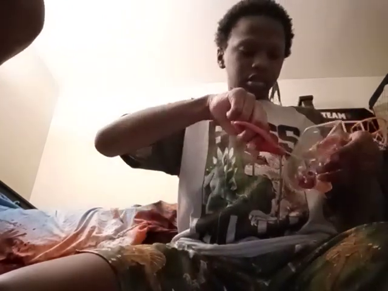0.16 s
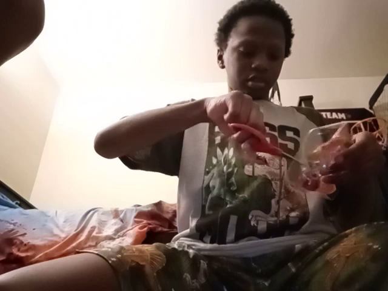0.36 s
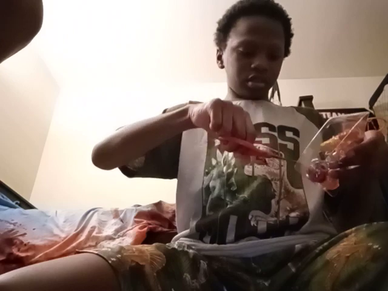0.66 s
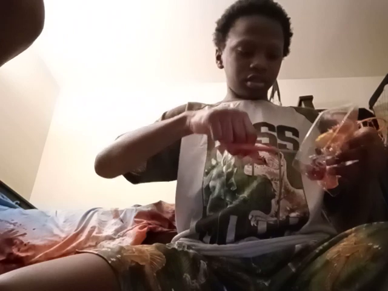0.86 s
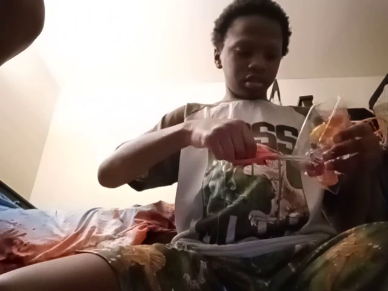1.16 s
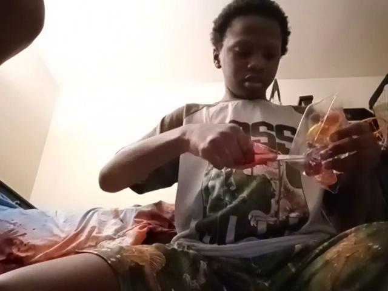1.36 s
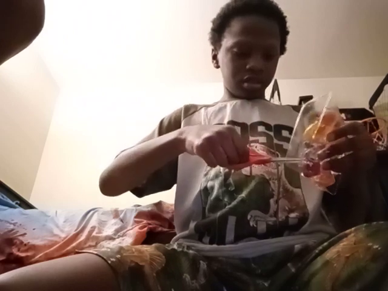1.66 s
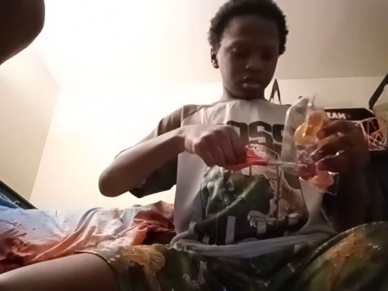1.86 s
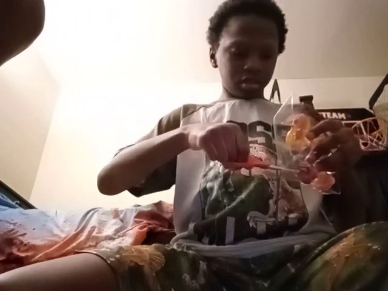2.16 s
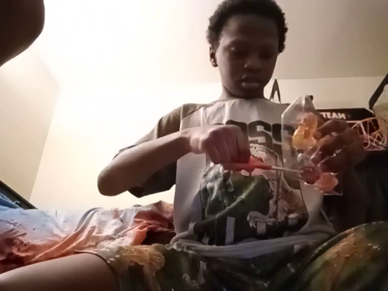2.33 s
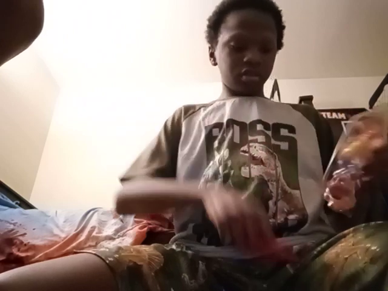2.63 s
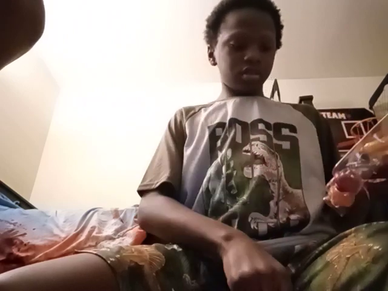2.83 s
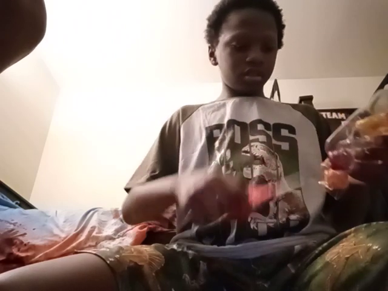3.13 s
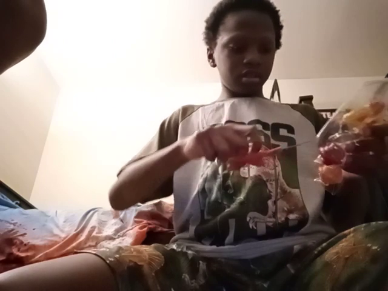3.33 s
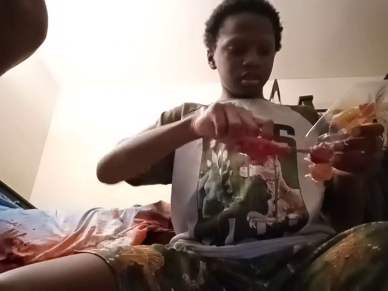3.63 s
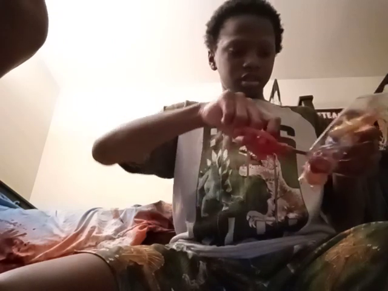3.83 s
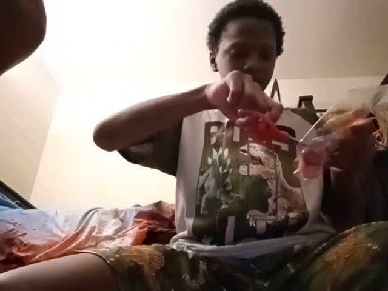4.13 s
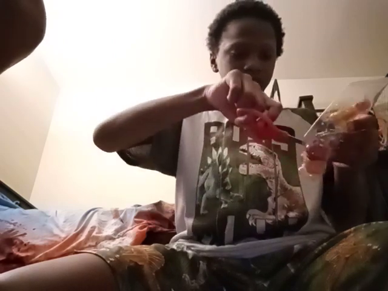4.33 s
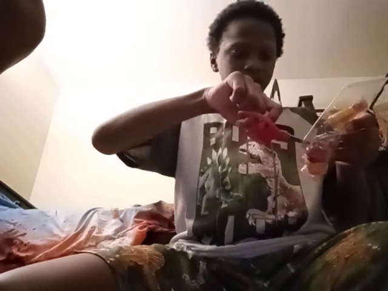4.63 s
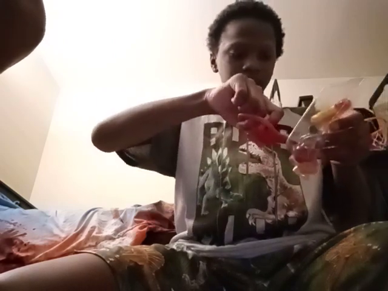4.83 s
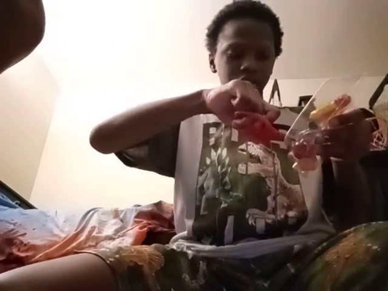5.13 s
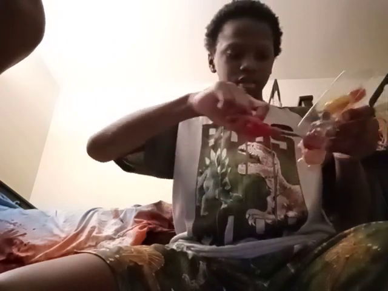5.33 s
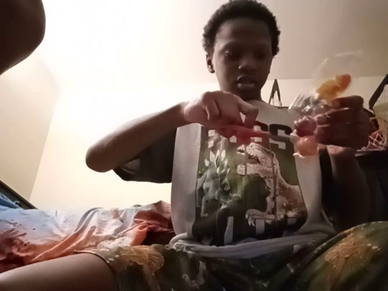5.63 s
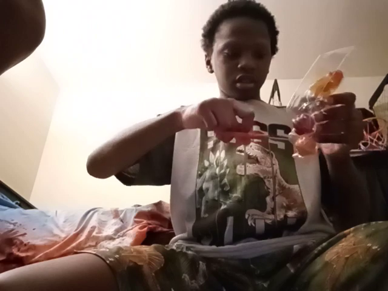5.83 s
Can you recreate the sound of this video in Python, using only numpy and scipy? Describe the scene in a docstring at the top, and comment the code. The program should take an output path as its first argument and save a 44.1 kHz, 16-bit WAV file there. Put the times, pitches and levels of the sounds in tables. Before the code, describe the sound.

Scissors cut into a stiff clear plastic package close to a phone microphone in a small room. A sharp clack and a brief squeak come first, then scattered ticks and light crinkling as the plastic buckles. Two more loud clacks land near the middle, followed by a busy run of clicks and scraping and a last loud clack. Hands bump softly throughout over a faint, steady hiss.

```python
"""Scissors in a blister pack

Scissors cut a stiff plastic shell in a small, bare room, close to a phone. The shell ticks as it
buckles, and crinkles and squeaks under friction; the scissors clack loudly four times, and the hands
bump softly as they shift their grip. The room rings after every click, and the phone's limiter
ducks the loudest ones over a steady hiss."""
import sys
import numpy as np
from scipy import signal
from scipy.fft import rfft, irfft, next_fast_len
from scipy.io import wavfile
from scipy.ndimage import uniform_filter1d

SR = 44100
rng = np.random.default_rng(int(sys.argv[2]) if len(sys.argv) > 2 else 0)


def dump(signal):
    """Clip the signal to [-1, 1] and save it as 16-bit WAV at the path in sys.argv[1]."""
    limited = np.clip(np.atleast_2d(signal).T, -1, 1)
    pcm = np.round(limited * 32767).astype(np.int16)
    wavfile.write(sys.argv[1], SR, pcm)


N = 263915


def amp(db):
    return 10 ** (np.asarray(db) / 20)


def unit_rms(x):
    return x / np.sqrt(np.mean(x ** 2) + 1e-20)


def unit_energy(x):
    return x / (np.linalg.norm(x) + 1e-20)


def clock(size):
    return np.arange(size) / SR


def along(points, hz):
    """Interpolation of (Hz, value) points on a logarithmic frequency axis."""
    point_hz, values = np.transpose(points)
    return np.interp(np.log(hz + 1), np.log(point_hz + 1), values)


def add(track, start, x):
    """Superposition: x joins the track at a start time in seconds."""
    i = max(round(start * SR), 0)
    track[i:i + len(x)] += x[:max(len(track) - i, 0)]


def coloured(x, db_of_hz):
    """Minimum-phase filtering by a gain curve: nothing sounds before its cause."""
    size = 2 * next_fast_len(len(x))
    gain = amp(db_of_hz(np.fft.rfftfreq(size, 1 / SR)))
    cepstrum = irfft(np.log(gain), size)
    cepstrum[1:size // 2] *= 2
    cepstrum[size // 2 + 1:] = 0
    return irfft(rfft(x, size) * np.exp(rfft(cepstrum)), size)[:len(x)]


def swell(length):
    """A critically damped envelope: it rises to 1 at a quarter of the length, then falls slowly."""
    u = clock(round(3 * length * SR)) / (length / 4)
    return u * np.exp(1 - u)


def burst(spectrum, t60, linger_db, linger_t60):
    """Two-slope decay of noise: a sharp fracture, then the weaker flutter of the sheet."""
    t = clock(4096)
    fade = amp(-60 * t / t60) + amp(linger_db - 60 * t / linger_t60)
    noise = fade * rng.standard_normal(len(t))
    return unit_energy(coloured(noise, lambda hz: along(spectrum, hz)))


def ring(modes, scatter_db, detune=0.01):
    """Free vibration: damped modes (Hz, dB, T60), their strength and pitch varying with each strike."""
    t = clock(4096)
    hz, db, t60 = np.transpose(modes)[:, :, None]
    strength, shift = rng.standard_normal((2, len(modes), 1))
    decay = amp(db + scatter_db * strength - 60 * t / t60)
    waves = decay * np.sin(2 * np.pi * hz * (1 + detune * shift) * t)
    polarity = (-1) ** np.arange(len(modes))
    return unit_energy(polarity @ waves)


# The background spectrum. Each row: frequency in Hz, relative level in dB.
FLOOR_SPECTRUM = [(20, -18.5), (60, -6), (125, -1.5), (220, -13), (500, -18), (1300, -22.5), (2900, -27.5),
                  (4300, -19.5), (5000, -29.5), (5400, -16), (6200, -17.5), (8200, -18.5), (10500, -18.5),
                  (16000, -19)]
# Peaks and one dip in the hiss. Each row: centre in Hz, half-width in Hz, gain in dB.
HISS_BANDS = [(1840, 50, 7), (3622, 166, 17.5), (4960, 140, -10), (7260, 680, 12), (9140, 620, 11)]
def noise_floor():
    """Stationary noise: faint room rumble and the microphone's hiss with its narrow bands."""
    def colour(hz):
        bands = sum(db * np.exp(-((hz - centre) / width) ** 2) for centre, width, db in HISS_BANDS)
        return along(FLOOR_SPECTRUM, hz) + bands
    return amp(-60) * unit_rms(coloured(rng.standard_normal(N), colour))


# The room's decay. Each row: frequency in Hz, reverberation time (T60) in seconds.
ROOM_DECAY = [(150, 0.31), (1000, 0.23), (3500, 0.3), (8000, 0.26), (15000, 0.19)]
def in_room(x, wet_db):
    """Reverberation: the direct sound, then uneven echoes that die fastest in the high treble."""
    hz, t, spectrogram = signal.stft(rng.standard_normal(SR // 2), SR, nperseg=256)
    decay = amp(-60 * t / along(ROOM_DECAY, hz)[:, None])
    tail = signal.istft(spectrogram * decay, SR, nperseg=256)[1]
    build_up = np.interp(clock(len(tail)), [0, .009, .012, .03], [.1, .4, .9, 1])  # far walls reply later
    clumps = amp(0.78 * unit_rms(uniform_filter1d(rng.standard_normal(len(tail)), size=60)))
    echoes = unit_energy(tail * build_up * clumps)
    tone = [(300, -1), (4000, -3.0), (8000, -4.0), (14000, -1.5)]
    response = amp(wet_db) * coloured(echoes, lambda f: along(tone, f))
    response[0] += 1  # the direct path
    return signal.fftconvolve(x, response)


# Shifts of grip. Each row: start in seconds, level in dB, pitch in Hz, nominal length in seconds.
GRIP_SHIFTS = [(0.396, -61.5, 115, 0.17), (0.606, -71.5, 125, 0.046), (0.82, -66.5, 104, 0.086),
               (0.95, -64, 130, 0.074), (1.164, -53, 146, 0.16), (1.657, -71.5, 310, 0.12),
               (2.9, -54, 190, .12), (3.17, -67.5, 118.3, 0.039), (3.605, -60, 145, 0.12),
               (3.726, -62, 156, 0.1), (3.91, -60, 103, 0.22), (5.116, -57, 101, 0.22),
               (5.621, -53.5, 144, 0.064), (5.679, -57.5, 115, 0.088)]
def hand_bumps():
    """Soft impact: hands shift the pack with low thuds, wider in band the harder and briefer they are."""
    usual_octaves, usual_db, usual_length = 0.92, -59.5, .1
    out = np.zeros(N)
    for start, db, pitch_hz, length in GRIP_SHIFTS:
        envelope = swell(length)
        octaves = usual_octaves * 2 ** ((db - usual_db) / 6) * np.sqrt(usual_length / length)
        def hump(hz):
            peak_db = -20 * np.log10(1 + (np.log2((hz + 1) / pitch_hz) / octaves) ** 2)
            treble_loss_db = 30 * np.log2(1 + (hz / 600) ** 2)
            return np.maximum(peak_db - treble_loss_db, -90)
        rumble = coloured(rng.standard_normal(SR), hump)[-len(envelope):]
        add(out, start, amp(db) * unit_rms(envelope * rumble))
    return out


# Steel singing on plastic. Each row: start and length in seconds, first and last pitch in Hz,
# level in dB.
SQUEAK_GLIDES = [(0, 0.078, 1183, 1193, -52), (0.337, 0.077, 1087, 1042, -31),
                 (0.935, 0.092, 4630, 4500, -69), (3.802, 0.112, 1160, 1240, -54),
                 (4.185, 0.17, 1085, 1040, -62.5)]
def squeaks():
    """Stick-slip oscillation: a blade catches and slides fast enough to sing a thin, unsteady note."""
    out = np.zeros(N)
    for start, length, first_hz, last_hz, db in SQUEAK_GLIDES:
        size = round(length * SR)
        waver = unit_rms(uniform_filter1d(rng.standard_normal(size), size=150))
        pitch_hz = np.linspace(first_hz, last_hz, size) * (1 + 0.046 * waver)
        note = np.sin(2 * np.pi * np.cumsum(pitch_hz) / SR)
        add(out, start, amp(db) * signal.windows.tukey(size, alpha=.5) * note)
    return in_room(out, wet_db=-7)[:N]


# The crackle of the plastic. Each row: frequency in Hz, relative level in dB.
CRACKLE_SPECTRUM = [(100, -56.5), (450, -12.5), (800, -17.5), (1300, -5.5), (1550, 2.5), (1800, -1.5),
                    (2200, 2), (2900, -5.5), (3800, 2.5), (4400, -2), (5100, -10), (6000, -24.5),
                    (9000, -60.5)]
# The shell's resonances. Each row: frequency in Hz, relative level in dB, T60 in seconds.
SHELL_MODES = [(1500, -8, .035), (1888, -2.5, .03), (2140, 8, 0.042), (2279, 8, .03), (2450, -13, 0.043),
               (3076, 1.5, .02), (3800, -5.5, .03), (3850, -5.5, 0.07), (4600, 5, 0.016)]
def shell_crackle(hard_db):
    """Impulse excitation: harder contact favours the upper modes; the thin sheet radiates little bass."""
    noise = burst(CRACKLE_SPECTRUM, t60=0.021, linger_db=-11.0, linger_t60=0.089)
    modes = amp(-8.5) * ring(SHELL_MODES, scatter_db=8.0, detune=0.029)  # strain shifts the modes
    hardness, radiation = [(1800, -0.38), (3600, 0.81)], [(150, -20), (700, -8)]
    tilt = lambda hz: hard_db * along(hardness, hz) + along(radiation, hz)
    return unit_energy(coloured(noise + modes, tilt))


# The cutting edge and the instant of fracture. Each row of both: frequency in Hz, relative level in dB.
EDGE_SPECTRUM = [(1500, -56), (4000, -30.5), (5400, -19.5), (6300, -7), (7000, -2.5), (7800, -2),
                 (9000, -5), (11000, -11), (16000, -24.5)]
FRACTURE_SPECTRUM = [(1000, -45), (5000, -8.5), (9500, -8.5), (14000, 1), (16000, -10.5)]
# The ping of the steel. Each row: frequency in Hz, relative level in dB, T60 in seconds.
BLADE_MODES = [(7080, -4.5, 0.025), (7750, 0, 0.0096), (8370, 1, 0.013)]
def blade_crack(hard_db, hollow_db):
    """Fracture at the edge: stronger on hard contact; the steel rings more freely if the panel gives."""
    edge = burst(EDGE_SPECTRUM, t60=0.021, linger_db=-16, linger_t60=0.048)
    fracture = burst(FRACTURE_SPECTRUM, t60=0.0034, linger_db=-12.5, linger_t60=0.041)
    ping = ring(BLADE_MODES, scatter_db=5.0)
    return unit_energy(edge + amp(-6.5 + .15 * hard_db) * fracture + amp(-4.5 + .8 * hollow_db) * ping)


def hollow_note(pitch_hz, t60):
    """Plate resonance: a buckling panel sounds a short note of three modes."""
    modes = [(pitch_hz, 0, t60), (pitch_hz * .7, -3, .018), (pitch_hz * 1.26, -6, .016)]
    tone = [(120, -30.5), (350, -24), (620, -1.5), (2000, 10.0), (6000, -21)]
    return unit_energy(coloured(ring(modes, scatter_db=1.5), lambda hz: along(tone, hz)))


# The low knock of a jolt. Each row: frequency in Hz, relative level in dB.
KNOCK_SPECTRUM = [(30, -74), (80, -7.5), (180, -10), (330, 6.5), (500, -1), (900, -25), (2000, -52.5)]
def click(pitch_hz, hollow_db, hollow_t60, hard_db, knock_db, steel_db):
    """One impulse drives four radiators; steel, hollow note and knock are set relative to the crackle."""
    crackle = shell_crackle(hard_db)
    crack = blade_crack(hard_db, hollow_db)
    hollow = hollow_note(pitch_hz, hollow_t60)
    knock = burst(KNOCK_SPECTRUM, t60=0.039, linger_db=-9, linger_t60=0.096)
    return crackle + amp(steel_db) * crack + amp(hollow_db) * hollow + amp(knock_db) * knock


# Blades and fingers sliding on the shell. Each row: start in seconds, level in dB,
# nominal length in seconds, steel in dB.
SLIDES = [(0, -48, 0.013, -2.5), (0.121, -53.5, 0.053, 0.5), (0.454, -54, 0.097, -14),
          (0.523, -58.5, 0.045, -0.5), (0.769, -60.5, 0.031, 9), (1.195, -58, 0.091, -1.5),
          (1.349, -59, 0.086, -2), (1.654, -61.5, 0.038, -0.5), (2.258, -59, 0.083, -16),
          (2.531, -59, 0.049, -8), (2.701, -62, 0.045, 9.5), (2.753, -58.5, 0.088, 4.5),
          (3.274, -71, 0.044, 2.5), (3.418, -73.5, 0.039, 0.5), (3.845, -60.5, 0.49, 2.5),
          (4.231, -55.5, 0.04, 2.5), (4.382, -50.5, 0.049, 6.5), (5.353, -55, 0.048, -3.5),
          (5.707, -69, 0.055, 1), (5.847, -61.5, 0.022, -7)]
def scrapes():
    """Sliding friction: tiny, uneven slips crinkle the shell; the more steel, the less hollow."""
    slips_per_s = 910
    out = np.zeros(N)
    for start, db, length, steel_db in SLIDES:
        envelope = swell(length)
        size = len(envelope)
        slips = rng.standard_normal(size) * (rng.random(size) < slips_per_s / SR)
        slip_sound = click(pitch_hz=950, hollow_db=-3 - steel_db, hollow_t60=0.0075,
                           hard_db=0.5, knock_db=-22.5, steel_db=steel_db)
        crinkle = signal.fftconvolve(slips, slip_sound)[:size]
        add(out, start, amp(db) * unit_rms(envelope * crinkle))
    return in_room(out, wet_db=-8.5)[:N]


# Small buckles and nips. Each row: start in seconds, level in dB, panel pitch in Hz, then in dB
# steel (the blade's part), give (how deeply the panel buckles) and knock.
BUCKLES = [(0.0145, -23.5, 1190, 13.5, 4.5, -11), (0.1412, -11, 896, -6, 0.5, -35),
           (0.4158, -10.5, 1067, -1.5, 3.5, -12.5), (1.0721, -16.5, 800, 0, 2, -8.5),
           (1.1211, -16, 1236, -12, -3, -17), (1.1466, -16, 1200, 10, -52, -32),
           (1.3707, -21.5, 604, -7.5, -2, -21), (1.3992, -12, 1123, 5.5, 1.5, -15),
           (1.4195, -13.5, 840, -3.5, 3, -38), (1.4221, -7.5, 1020, -11, -5.5, -20),
           (1.7222, -14.5, 1290, 8, 0, -13.5), (1.9947, -17, 876, -13, 6.5, -21),
           (2.0489, -18.5, 1126, -9, 5, -23), (2.2142, -19.5, 1220, 5.5, 5.5, -8.5),
           (2.2704, -13.5, 1140, -15, -8, -3.5), (2.2773, -24.5, 1125, -16, 10.5, -8),
           (2.7861, -26, 770, 6.5, -14, -30), (2.9209, -3.5, 983, 4, 5, -4),
           (3.1263, -25.5, 820, 16, -45.5, -37), (3.6948, -18, 820, -6, -0.5, -38.5),
           (3.7701, -16, 774, 8.5, -1.5, -28), (3.782, -12.5, 970, 8.5, -6.5, -26.5),
           (3.909, -19, 1255, -3.5, -9, -30), (3.944, -12.5, 1130, 10.5, -1, -39),
           (3.9835, -17.5, 1180, -14, -18, -28), (4.0706, -7.5, 844, -4, -4, -19),
           (4.081, -17, 1200, -2, 2.5, -30), (4.308, -13.5, 1145, 7.5, -3.5, -29),
           (4.3359, -26.5, 1110, -5, -4, -12), (4.4519, -8.5, 1135, -4, -14.5, -36),
           (4.6985, -26, 1256, -1.5, -12.5, -21), (4.783, -14, 1280, -6, -7.5, -44),
           (4.861, -20, 1170, 12.5, -4.5, -23), (4.9379, -16, 863, 0, -9, -32),
           (5.3765, -12, 1110, -6, -21, -44), (5.382, -12, 1260, -2, -31, -38),
           (5.7626, -12.5, 930, -10.5, 2.5, -13.5)]
def shell_ticks():
    """Contact stiffness sets timbre: a nip of steel is hard and thin, a giving panel soft and hollow."""
    hollow_t60 = .032  # fingers damp the panel to a short tock
    out = np.zeros(N)
    for start, db, pitch_hz, steel_db, give_db, knock_db in BUCKLES:
        hard_db = -5 + 0.42 * steel_db - 0.18 * give_db
        hollow_db = give_db - 1
        wet_db = -4 + 0.14 * give_db  # a giving panel radiates all round the room
        tick = click(pitch_hz, hollow_db, hollow_t60, hard_db, knock_db, steel_db)
        add(out, start, amp(db) * in_room(tick, wet_db))
    return out


# Loud scissor clacks, the third with a heavy knock. Each row: time in seconds, level in dB, relative
# level of the lead-in click in dB, pitch in Hz, then in dB hollow note, knock, steel and reverberation.
CLACKS = [(0.3287, 3.5, -14.5, 1033, -1.5, -30, 4.5, -4), (2.3605, 7.5, 5.5, 1040, -4, -25, 1, -5.5),
          (2.8869, 7, -52, 1037, -1, -7.5, 1.5, -5.5), (5.1792, 10, -13.5, 840, -6.5, -29, 3, -2)]
def scissor_clacks():
    """Hard impact: a lead-in click, the clack, and a slightly weaker layer to thicken and smooth it."""
    lead_s, layer_lag_s = 0.0037, 0.0009204
    hollow_t60, hard_db = 0.019, 0.76
    out = np.zeros(N)
    for when, db, lead_db, pitch_hz, hollow_db, knock_db, steel_db, wet_db in CLACKS:
        lead_in = (when - lead_s, db + lead_db)
        second_layer = (when + layer_lag_s, db - 4)
        for start, level_db in (lead_in, (when, db), second_layer):
            clack = click(pitch_hz, hollow_db, hollow_t60, hard_db, knock_db, steel_db)
            add(out, start, amp(level_db) * in_room(clack, wet_db))
    return out


def scene():
    """Superposition: the pressures of all sources add at one microphone."""
    return (scissor_clacks() + shell_ticks() + scrapes() + squeaks() + hand_bumps() + noise_floor())[None]


def limiter(x, ceiling_db, release_db_per_s):
    """Peak limiting: the gain drops at once on a peak and climbs back at a steady rate."""
    over_db = np.maximum(20 * np.log10(np.abs(x) + 1e-9) - ceiling_db, 0)
    climb_db = release_db_per_s * clock(N)
    cut_db = np.maximum.accumulate(over_db + climb_db, axis=-1) - climb_db
    return x * amp(-uniform_filter1d(cut_db, size=16))


def record(dry):
    """Finite range and bandwidth: the phone limits the peaks and sheds deep bass and the highest treble."""
    limited = limiter(dry, ceiling_db=-8.0, release_db_per_s=89)
    thinned = signal.sosfilt(signal.butter(3, 54, "highpass", fs=SR, output="sos"), limited)
    return signal.sosfilt(signal.butter(24, 16000, "lowpass", fs=SR, output="sos"), thinned)


dry = scene()
out = record(dry)
dump(out)
```